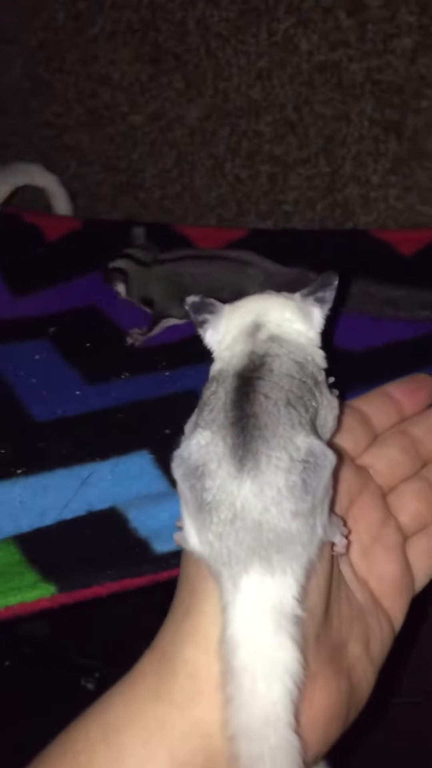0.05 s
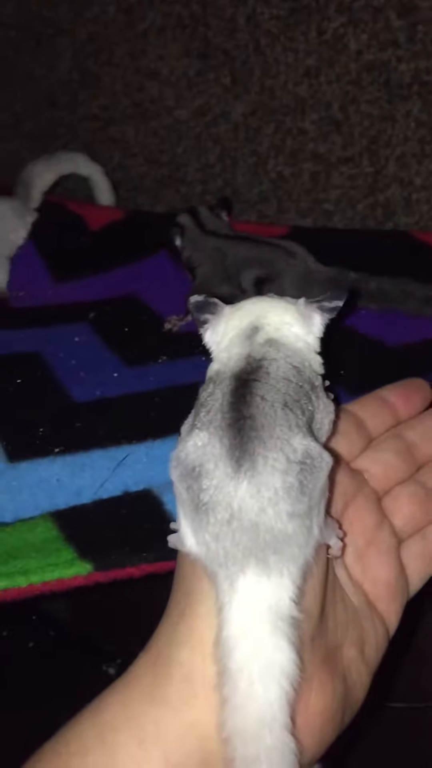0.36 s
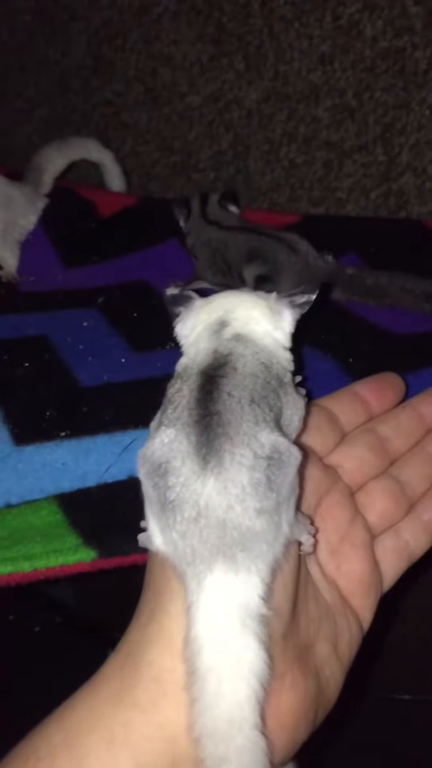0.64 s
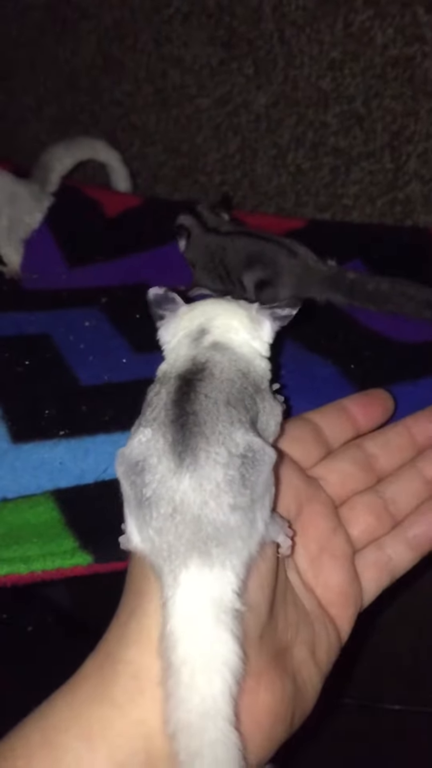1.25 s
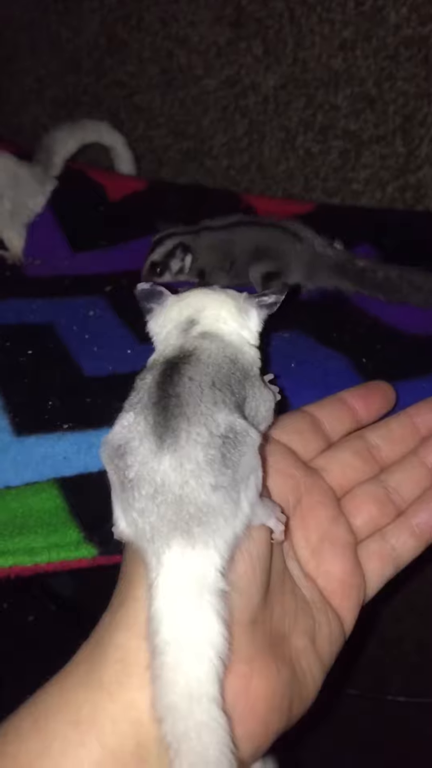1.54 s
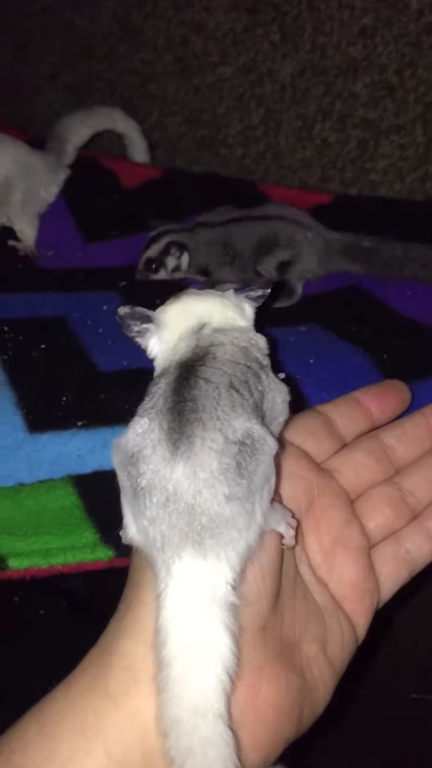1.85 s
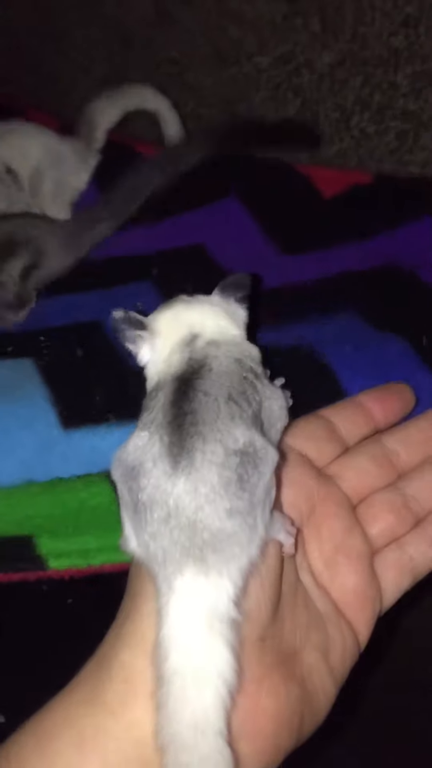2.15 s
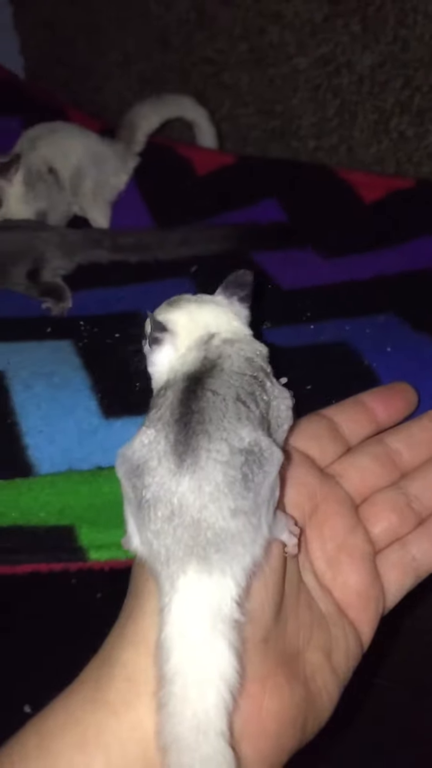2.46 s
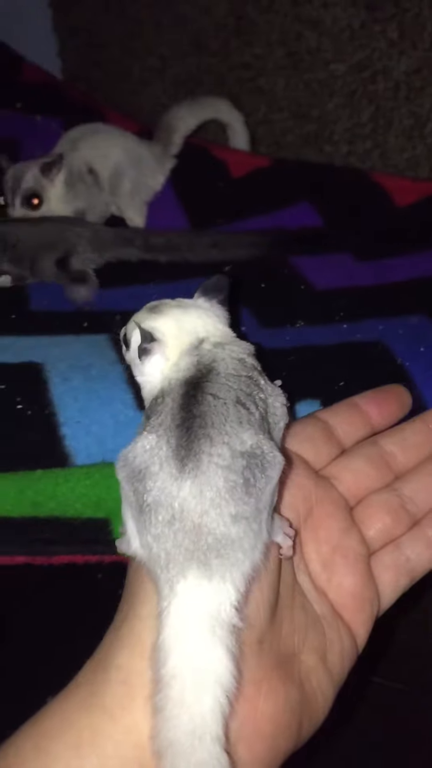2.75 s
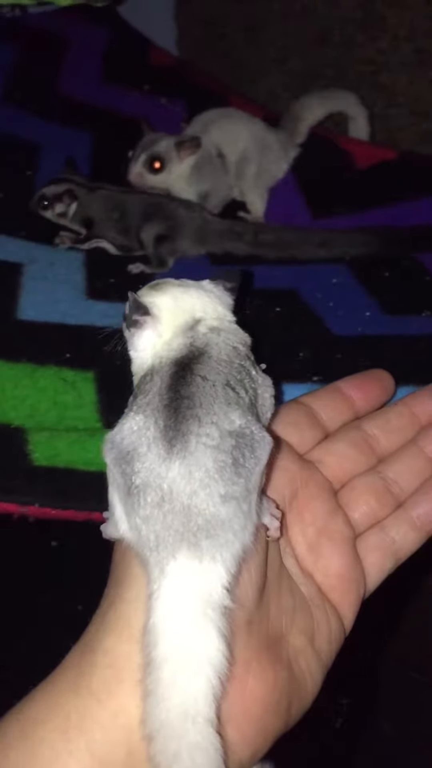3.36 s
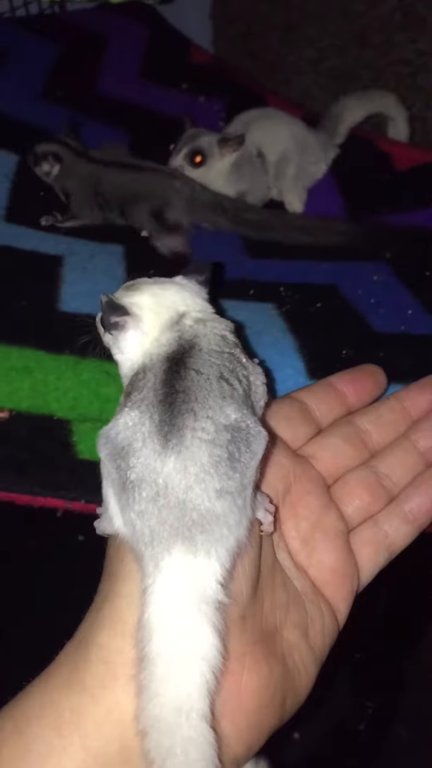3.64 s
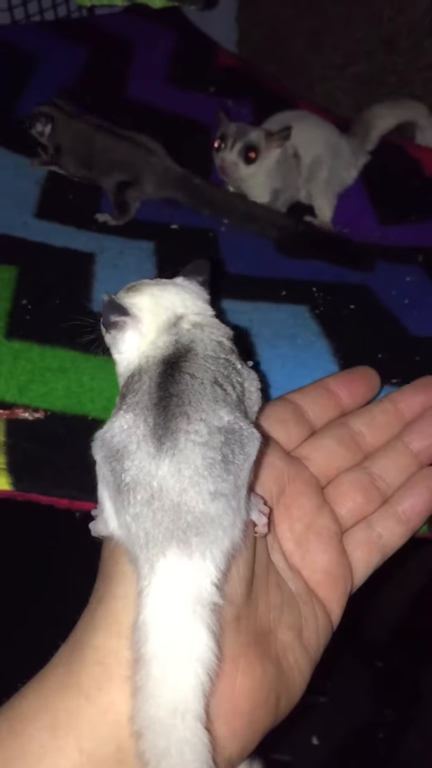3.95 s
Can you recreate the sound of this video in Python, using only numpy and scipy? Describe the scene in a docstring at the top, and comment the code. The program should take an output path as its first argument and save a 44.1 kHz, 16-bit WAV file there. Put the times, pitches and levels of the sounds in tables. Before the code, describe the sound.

Small animals click and rasp near the microphone. After a few faint scratches and a soft bump on a blanket, sharp crackling chatter breaks out, then settles into scattered clicks and brief hisses over a low room rumble.

```python
"""Sugar gliders on a fleece blanket.

A few faint claw ticks, then one lunges: a rush of dry rasps and clicks with a few small knocks,
thinning to single pops and thin hisses as they settle. Claws and mouths are the likely makers.
Rasps are dense runs of tiny snaps; clicks are a pop plus a bright tick; knocks are damped modes.
Fur and fleece rustle underneath, in a quiet room with a low rumble."""
import sys
import numpy as np
from scipy import signal
from scipy.fft import rfft, irfft
from scipy.io import wavfile
from scipy.ndimage import uniform_filter1d

SR = 44100
rng = np.random.default_rng(int(sys.argv[2]) if len(sys.argv) > 2 else 0)


def dump_mix(stems):
    """Bounce the given channels to the path in sys.argv[1] as a 16-bit WAV at rate SR."""
    frames = np.atleast_2d(stems).T  # one column per channel
    limited = np.clip(frames, -1, 1)  # hard clip at full scale
    pcm = np.round(limited * 32767).astype(np.int16)
    wavfile.write(sys.argv[1], SR, pcm)


N = 176400

# Sharp clicks. Each row: time in seconds, pop level in dB, pop pitch in Hz, tick level in dB,
# tick pitch in Hz.
CLICK_EVENTS = [(2.193,-24.5,1660,-30,8500), (2.196,-33,1930,-18.5,8700), (2.2092,-28,2880,-24,3970),
                (2.2171,-22,1270,-22,3310), (2.2298,-33,2250,-27,9150), (2.2733,-27,2080,-31,4360),
                (2.335,-31,2260,-42,4660), (2.3418,-20,2160,-17,5130), (2.3819,-22,1700,-29.5,8700),
                (2.3905,-19,1370,-40,8500), (2.4105,-32,1740,-25,8750), (2.5245,-26.5,2180,-33,6830),
                (2.5608,-30,2230,-35,6750), (2.6387,-44,1860,-28,6900), (2.801,-23.5,1660,-37,7250),
                (3.0361,-37,1260,-34.5,3200), (3.3949,-22,2020,-30,8830), (3.536,-25,2070,-34,8300),
                (3.5933,-26.5,1650,-20.5,7080), (3.7491,-25,1550,-33.5,9550), (3.8606,-30,2020,-41,8340)]
# Rasps and hisses. Each row: start and length in seconds, then low, middle and high band levels in dB.
RASP_EVENTS = [(1.34,0.052,-71.5,-73.5,-74.5), (2.188,0.0086,-43,-41.5,-38), (2.209,0.013,-43,-36.5,-44),
               (2.2513,0.0047,-49.5,-38.5,-46.5), (2.268,0.016,-42.5,-49,-51.5),
               (2.289,0.016,-52.5,-49,-52), (2.336,0.01,-41.5,-52,-52), (2.386,0.021,-56,-56,-59),
               (2.446,0.004,-48.5,-53,-60), (2.459,0.0098,-48.5,-52.5,-63), (2.608,0.0049,-53.5,-48.5,-60),
               (2.621,.006,-55,-46,-68), (2.636,0.0066,-47,-58,-51), (2.689,0.042,-60.5,-66,-53.5),
               (2.791,0.012,-46,-61,-62), (2.908,0.0088,-54,-56,-45.5), (2.922,0.036,-57.5,-62.5,-63.5),
               (2.965,0.017,-62,-60.5,-43), (2.984,0.026,-64,-76,-52), (3.064,0.022,-67,-69,-46),
               (3.107,0.039,-72,-76,-61.5), (3.148,0.026,-64,-69,-55.5), (3.291,0.022,-57,-63,-63),
               (3.347,0.02,-61.5,-62,-69), (3.3808,0.0018,-50,-45.5,-46.5), (3.388,0.0065,-49.5,-60,-65),
               (3.59,0.011,-72,-74,-49.5), (3.9232,0.0035,-62,-73,-40)]
# Claw ticks. Each row: start in seconds, level in dB, pitch in Hz.
CLAW_EVENTS = [(0.384,-57.5,3500), (0.554,-64,7200), (0.951,-60,5460), (1.015,-51.5,3060), (1.243,-59,5370),
               (1.257,-59,5500), (1.337,-56.5,3340), (2.365,-47,9980), (2.4205,-43,5280), (2.541,-44,8600),
               (2.696,-44.5,9050), (2.4465,-45,2000), (3.069,-43,6180), (3.3025,-37.5,2340),
               (3.967,-53.5,4600)]
# Hollow knocks. Each row: start in seconds, level in dB, pitch as a ratio.
KNOCK_EVENTS = [(0.384,-49,.88), (2.3423, -31.5, 0.8), (2.3915, -19.5, 1), (3.036, -35, 0.94)]
# Knock modes. Each row: frequency in Hz at pitch ratio 1, relative level in dB, T60 in seconds.
RING_MODES = [(1000, -16.5, 0.035), (1028, -8.5, 0.03), (1187, -5.5, 0.03), (1370, -9, 0.031),
              (1980, -12, 0.03), (3620, -26, 0.043)]
# Fur and fleece rustle envelope. Each row: time in seconds, level in dB.
RUSTLE_ENVELOPE = [(2.145, -80), (2.189, -53), (2.5, -63.5), (3.2, -75.5), (4, -73)]
# Bumps and brushes on the blanket. Each row: start in seconds, length in seconds, level in dB,
# pitch in Hz.
BUMP_EVENTS = [(0.206, 0.074, -54, 377), (0.212, 0.116, -45, 140), (1.95, 0.11, -41.5, 132),
               (2.342, 0.0194, -44, 363)]
# Spectra of the three rasp bands, click ticks, rustle and room noise.
# Each row: frequency in Hz, relative gain in dB.
LOW_SPECTRUM = [(100, -15), (700, -12.5), (1050, 0), (1500, -7.5), (2150, 4), (2700, -7.5), (3600, -16.5),
                (8000, -58)]
MIDDLE_SPECTRUM = [(500, -84), (2200, -5.5), (3200, 3.5), (4000, -2), (5200, -2), (6200, -3), (8500, -39),
                   (16000, -19)]
HIGH_SPECTRUM = [(1000, -48), (5000, -16), (7030, 7.5), (7600, -10), (8500, 5), (11000, -4), (16000, -21)]
TICK_SPECTRUM = [(500, -34), (3000, -8.5), (9500, -1), (12500, -11), (16000, -41)]
RUSTLE_SPECTRUM = [(200, -5.5), (1000, 2), (2200, 2.5), (9000, -9), (16000, -22.5)]
FLOOR_SPECTRUM = [(25,-54), (45,-12.5), (85,-1.5), (105,-5), (160,1), (210,-7.5), (265,-10.5), (370,-20),
                  (439,-16.5), (545,-27), (1000,-33.5), (4250,-44.5), (16000,-52.5)]
# Room decay. Each row: frequency in Hz, T60 in seconds.
ROOM_DECAY = [(200, 0.3), (2000, 0.14), (12000, 0.1)]

BAND_LIMIT_HZ = 16100


def clicks():
    """Each click: a pop of about one cycle, a bright ringing tick and brief noisy tails."""
    pop_lead_s, pop_sigma_cycles, pop_tail_db, pop_tail_s = 0.002, 0.39, -18, 0.0014
    ring_s, burst_s, burst_db, tick_tail_db, tick_tail_s = 0.00046, 0.0005, -7.5, -16, 0.0029
    tones, tail_envelope, tick_envelope = np.zeros((3, N))
    t = np.arange(SR // 20) / SR
    burst = np.exp(-t / burst_s) + amp(tick_tail_db) * np.exp(-t / tick_tail_s)
    for time_s, pop_db, pop_hz, tick_db, tick_hz in CLICK_EVENTS:
        cycles = (t - pop_lead_s) * pop_hz
        pop = np.exp(-.5 * (cycles / pop_sigma_cycles) ** 2) * np.cos(2 * np.pi * cycles)
        add(tones, time_s - pop_lead_s, amp(pop_db) * pop)
        add(tail_envelope, time_s, amp(pop_db + pop_tail_db) * np.exp(-t / pop_tail_s))
        tick = np.exp(-t / ring_s) * np.sin(2 * np.pi * tick_hz * t)
        add(tones, time_s - burst_s / 2, amp(tick_db) * tick)
        add(tick_envelope, time_s - burst_s / 2, amp(tick_db + burst_db) * burst)
    pop_noise = colour(tail_envelope * rng.standard_normal(N), LOW_SPECTRUM)
    tick_noise = colour(tick_envelope * rng.choice([-1, 1], N), TICK_SPECTRUM)
    return tones + pop_noise + tick_noise


def rasps(attack_s=0.0017, release_s=0.0029):
    """Runs of snaps excite three broad resonances, from throaty rasp to thin hiss."""
    envelopes = np.zeros((3, N))
    for start_s, length_s, *bands_db in RASP_EVENTS:
        t = np.arange(0, length_s + 6 * release_s, 1 / SR)
        shape = np.minimum(t / attack_s, 1) * np.exp(-np.maximum(t - length_s, 0) / release_s)
        for envelope, db in zip(envelopes, bands_db):
            add(envelope, start_s, amp(db) * shape)
    spectra = LOW_SPECTRUM, MIDDLE_SPECTRUM, HIGH_SPECTRUM
    return sum(colour(envelope * snaps(), spectrum) for envelope, spectrum in zip(envelopes, spectra))


def snaps(rate_hz=10000, ring_s=0.00072, spread_db=3, clump_s=0.0015, clump_db=3.5, pitches=40):
    """Tiny snaps of uneven size, in clumps, each ringing briefly at one of many pitches."""
    t, out = np.arange(SR // 100) / SR, np.zeros(N)
    onsets = np.flatnonzero(rng.random(N) < rate_hz / SR)
    clumps = unit(uniform_filter1d(rng.standard_normal(N), round(clump_s * SR)))
    scatter_db = spread_db * np.minimum(rng.exponential(1, len(onsets)), 4)
    sizes = amp(scatter_db + clump_db * np.minimum(clumps[onsets], 2))
    sizes *= rng.choice([-1, 1], len(onsets))
    for k in range(pitches):
        train = np.zeros(N)
        train[onsets[k::pitches]] = sizes[k::pitches]
        hz = BAND_LIMIT_HZ * (k * (1 + np.sqrt(5)) / 2 % 1)  # golden-ratio spacing
        out += signal.oaconvolve(train, np.exp(-t / ring_s) * np.cos(2 * np.pi * hz * t))[:N]
    return unit(out)


def knocks(rasping, stir_db=-37.5):
    """A hollow ring, struck by knocks and faintly stirred by the rasps."""
    out = amp(stir_db) * signal.oaconvolve(rasping, hollow_ring(1))[:N]
    for start_s, db, pitch_ratio in KNOCK_EVENTS:
        add(out, start_s, amp(db) * hollow_ring(pitch_ratio))
    return out


def hollow_ring(pitch_ratio):
    """Impulse response of a few damped modes."""
    t = np.arange(SR // 10) / SR
    return sum(amp(db - 60 * t / t60_s) * np.sin(2 * np.pi * hz * pitch_ratio * t)
               for hz, db, t60_s in RING_MODES)


def claw_ticks(scratch_s=0.0041, ring_s=0.0016, ring_db=-2):
    """Short rough scratches, each partly heard through one narrow resonance."""
    t, out = np.arange(SR // 20) / SR, np.zeros(N)
    for start_s, db, hz in CLAW_EVENTS:
        scratch = rng.standard_normal(len(t)) * np.exp(-t / scratch_s)
        mode = np.exp(-t / ring_s) * np.sin(2 * np.pi * hz * t)
        ringing = signal.oaconvolve(scratch, mode / np.linalg.norm(mode))[:len(t)]
        add(out, start_s, amp(db) * (amp(ring_db) * ringing + colour(scratch, RUSTLE_SPECTRUM)))
    return out


def rustle():
    """Faint crackle of bodies moving over cloth."""
    level_db = np.interp(np.arange(N) / SR, *np.transpose(RUSTLE_ENVELOPE))
    return colour(snaps() * amp(level_db), RUSTLE_SPECTRUM)


def blanket_bumps(sigma_ratio=0.21):
    """Soft bumps and brushes: tapered bursts of low narrowband noise."""
    hz, out = np.fft.rfftfreq(N, 1 / SR), np.zeros(N)
    for start_s, length_s, db, pitch_hz in BUMP_EVENTS:
        band = shaped_noise(np.exp(-.5 * ((hz / pitch_hz - 1) / sigma_ratio) ** 2))
        burst = band[round(start_s * SR):][:round(length_s * SR)]
        add(out, start_s, amp(db) * unit(burst * signal.windows.tukey(len(burst))))
    return out


def room(x, reflections=8, early_s=0.011, early_db=-12, tail_db=-16):
    """Near reflections and the short tail of a carpeted room."""
    early = np.zeros(SR // 10)
    delays = (early_s * rng.uniform(0.054, 1, reflections) * SR).astype(int)
    early[delays] = rng.choice([-1, 1], reflections) / np.sqrt(reflections)
    hz, t, noise = signal.stft(rng.standard_normal(SR // 2), SR, nperseg=256)
    tail = signal.istft(noise * amp(-60 * t / interp_log_hz(ROOM_DECAY, hz)[:, None]), SR)[1]
    echoes = amp(early_db) * signal.oaconvolve(x, early)[:N]
    return echoes + amp(tail_db) * signal.oaconvolve(x, tail / np.linalg.norm(tail))[:N]


def rumble(floor_db=-48, bass_hz=450, swell_rms_db=2, swell_max_hz=11):
    """Steady hiss over a low rumble that swells unevenly."""
    hz = np.fft.rfftfreq(N, 1 / SR)
    floor = amp(floor_db) * unit(shaped_noise(amp(interp_log_hz(FLOOR_SPECTRUM, hz))))
    bass = irfft(rfft(floor) * (hz < bass_hz), N)
    swell = unit(shaped_noise((hz > 1) & (hz < swell_max_hz)))
    return floor + bass * (amp(swell_rms_db * swell) - 1)


def amp(db):
    """Decibels to gain."""
    return 10 ** (np.asarray(db) / 20)


def unit(x):
    """Scales to rms 1."""
    return x / np.sqrt(np.mean(x ** 2) + 1e-20)


def interp_log_hz(table, hz):
    """Reads a table on a log-frequency axis."""
    table_hz, values = np.transpose(table)
    return np.interp(np.log(hz + 1), np.log(table_hz + 1), values)


def add(mix, start_s, sound):
    """Mixes a sound in, in place."""
    part = mix[max(round(start_s * SR), 0):][:len(sound)]
    part += sound[:len(part)]


def shaped_noise(gains):
    """White noise weighted per FFT bin."""
    return irfft(rfft(rng.standard_normal(N)) * gains, N)


def colour(x, spectrum, size=4096):
    """Minimum-phase filter of unit energy with the given spectrum."""
    hz = abs(np.fft.fftfreq(size, 1 / SR))
    log_gain = np.log(amp(interp_log_hz(spectrum, hz)))
    taps = np.fft.ifft(np.exp(signal.hilbert(log_gain).conj())).real[:size // 2]
    return signal.oaconvolve(x, taps / np.linalg.norm(taps))[:len(x)]


def scene():
    """Animals, room, rumble and blanket bumps, in mono."""
    rasping = rasps()
    animals = clicks() + claw_ticks() + rasping + knocks(rasping) + rustle()
    return (animals + room(animals) + rumble() + blanket_bumps())[None]


def record(dry):
    """Low-pass at the band limit."""
    taps = signal.firwin(511, BAND_LIMIT_HZ, window=("kaiser", 9), fs=SR)
    return signal.oaconvolve(dry, taps[None], "same")


dry = scene()
out = record(dry)
dump_mix(out)
```